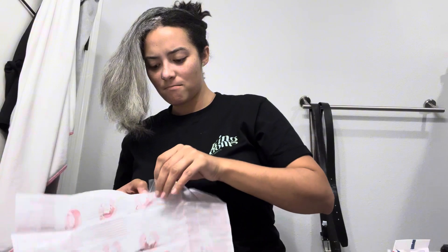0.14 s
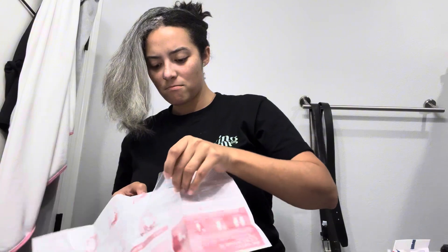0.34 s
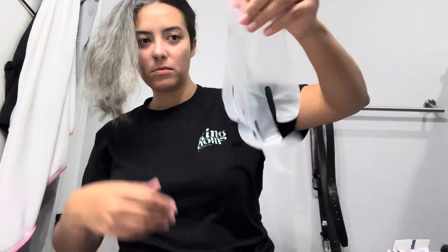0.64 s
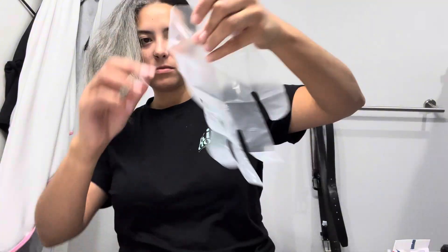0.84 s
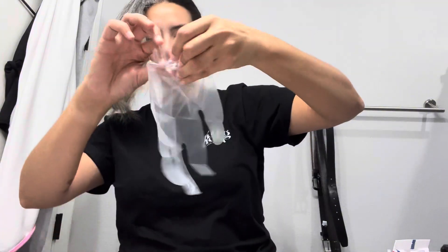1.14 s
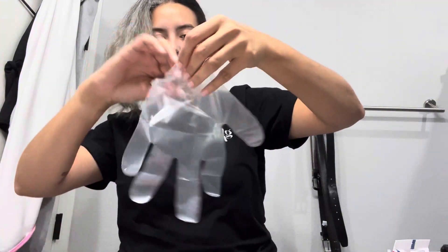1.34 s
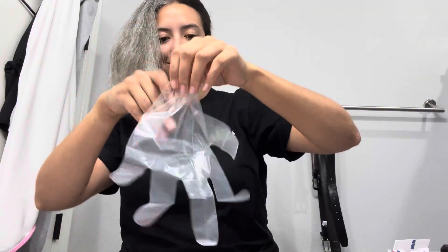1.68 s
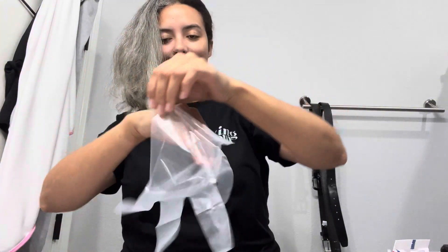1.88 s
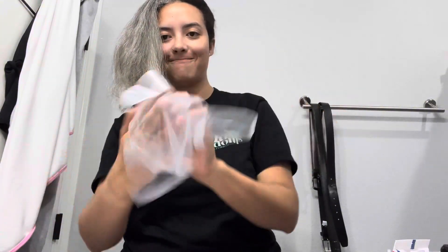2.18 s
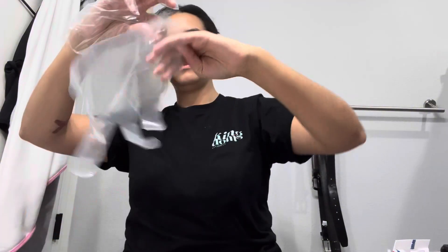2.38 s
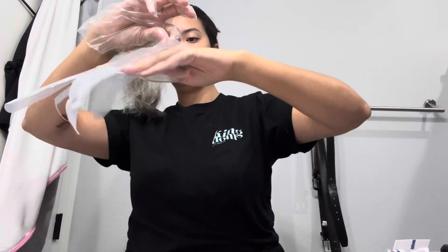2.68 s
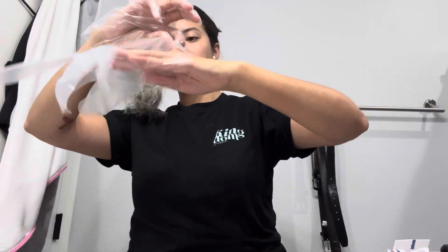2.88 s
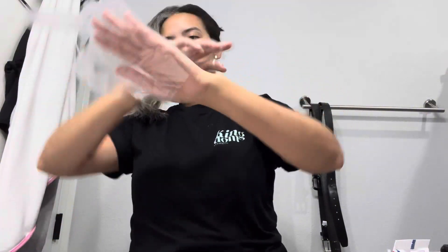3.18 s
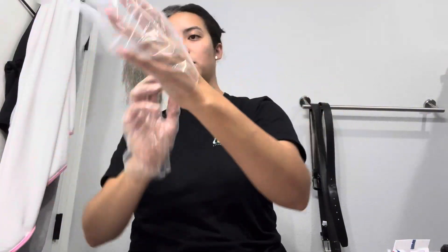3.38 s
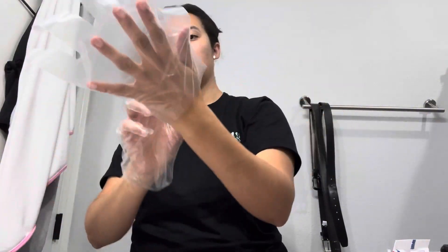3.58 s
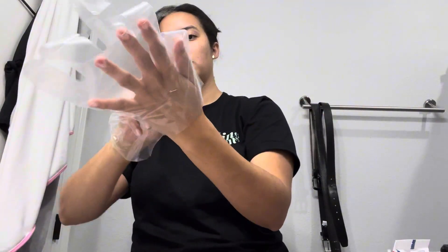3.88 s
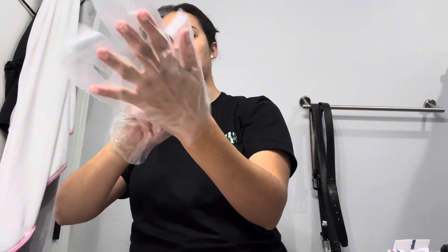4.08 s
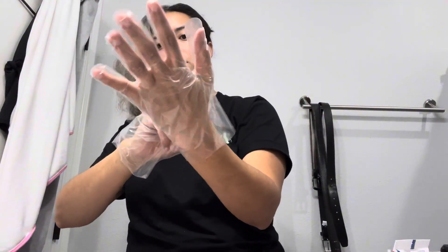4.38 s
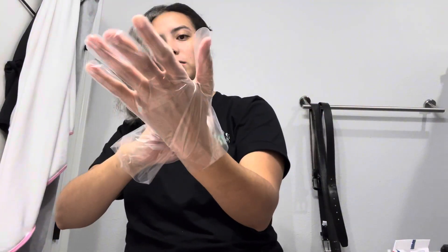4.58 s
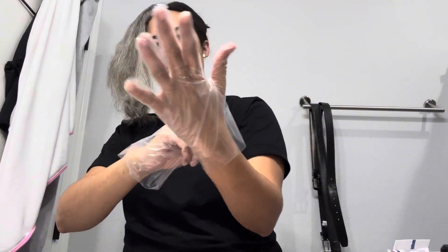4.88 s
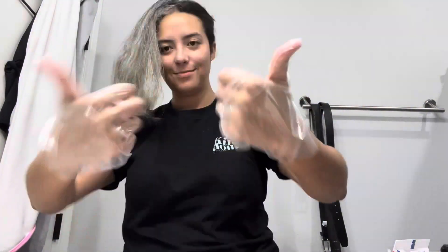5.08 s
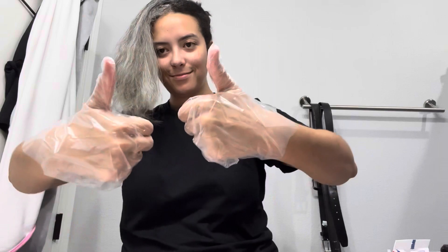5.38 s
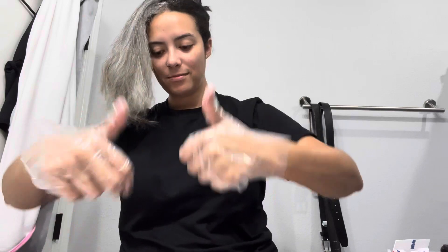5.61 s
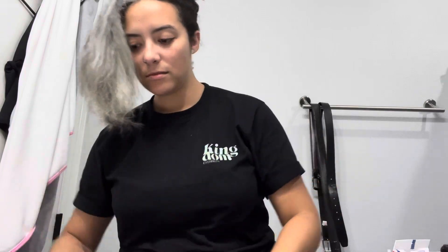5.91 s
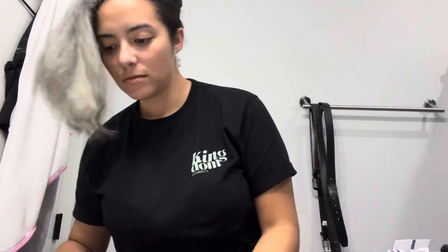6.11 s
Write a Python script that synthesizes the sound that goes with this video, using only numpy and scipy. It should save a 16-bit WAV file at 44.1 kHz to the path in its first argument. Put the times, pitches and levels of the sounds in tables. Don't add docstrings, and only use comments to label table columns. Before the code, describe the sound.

In a small, hard bathroom, close to a stereo microphone, a low fan hum near 59 Hz and soft air rumble run throughout. From 0 to 0.69 s a stiff folded leaflet is pulled open: dense crackle, low sheet flexing and hard snaps, loudest around 0.28 to 0.57 s. A tiny gap cuts to thin plastic gloves, much quieter and brighter. Sparse rustle grows from 1.0 s into uneven crackling bursts, stronger around 1.7 to 2.2 s. Another gap at 2.28 s, then the second glove: light rustles, firmer at 2.9 s and strongest near 4.0 to 4.1 s, followed by dense fine ticks until 5.12 s. After a third short gap, the crackle fades almost to nothing around 5.3 to 5.5 s, returns softly to 6.1 s, then paper crackles and bumps the counter with small thuds near 6.22 s.

```python
import sys
import numpy as np
from scipy import signal
from scipy.fft import rfft, irfft, next_fast_len
from scipy.io import wavfile
from scipy.ndimage import uniform_filter1d, minimum_filter1d

SR = 44100
rng = np.random.default_rng(int(sys.argv[2]) if len(sys.argv) > 2 else 0)


def transcribe(u):
    v = np.clip(np.atleast_2d(u).T, -1, 1)
    q = np.round(v * 32767).astype(np.int16)
    wavfile.write(sys.argv[1], SR, q)


N = 275625
TIME = np.arange(N) / SR
SIZE = next_fast_len(N + SR)
HZ = np.maximum(np.arange(SIZE // 2 + 1) * SR / SIZE, 1)
LEAFLET_DOWN_S, LEAFLET_BACK_S = .69, 6.15

# start t/s, length/s, crackle level/dB at first, at the end
PAPER_MOVES = [(0.0, 0.057, -53, -56), (.078, 0.014, -50, -38.5), (.11, 0.035, -54, -61),
               (.166, 0.028, -38, -48), (.215, 0.062, -54, -50), (.278, 0.018, -34.5, -42.5),
               (.31, .05, -43.5, -42), (.372, 0.034, -35.5, -40), (.42, 0.032, -33.5, -39),
               (.46, 0.038, -39, -46), (.574, 0.01, -33, -51), (6.17, .03, -52, -55),
               (6.213, 0.069, -37.5, -55)]
# start t/s, length/s, crackle level/dB at
GLOVE_MOVES = [(.70, 0.068, -59.5, -57.5), (.80, 0.064, -53, -57), (.90, 0.04, -63, -60.5),
               (.95, 0.052, -64, -53), (1.0, 0.065, -50.5, -47.5), (1.10, 0.16, -48.5, -56.5),
               (1.30, 0.1, -49.5, -47), (1.45, 0.13, -47.5, -48), (1.64, 0.13, -47.5, -46),
               (1.74, 0.15, -43.5, -53), (1.92, 0.2, -43, -53.5), (2.04, 0.12, -45.5, -52.5),
               (2.165, 0.041, -37.5, -50.5), (2.30, .04, -45.5, -57.5), (2.356, 0.023, -44.5, -58.5),
               (2.41, 0.048, -58, -59),
               (2.49, 0.21, -61, -54), (2.657, 0.22, -59.5, -53), (2.898, 0.13, -46, -43),
                 (3.085, 0.10, -64, -54.5), (3.199, 0.033, -49, -52), (3.24, 0.17, -51.5, -57.5),
                 (3.41, 0.034, -57, -63), (3.475, 0.073, -49.5, -49.5), (3.59, 0.17, -54, -54.5),
                 (3.786, 0.11, -54, -47), (3.957, 0.15, -48.5, -39), (4.197, 0.051, -51, -44.5),
                 (4.304, 0.15, -54, -53.5), (4.485, 0.048, -54, -54.5), (4.569, .04, -49.5, -64),
                 (4.66, 0.048, -52, -61), (4.73, 0.085, -54, -57.5), (4.856, 0.034, -58, -50.5),
                 (4.9, 0.2, -62.5, -54), (5.024, 0.08, -49, -49.5), (5.134, 0.07, -67, -60.5),
                 (5.237, 0.058, -55, -67.5), (5.283, 0.032, -64.5, -79), (5.334, 0.014, -71, -86),
                 (5.387, 0.026, -69, -76), (5.46, 0.023, -75, -66), (5.544, 0.15, -59.5, -53),
                 (5.694, 0.18, -56.5, -49.5), (5.924, 0.27, -61.5, -57)]
# t/s, level/dB
TAUTNESS = [(.7, 0), (1.7, -3), (2.5, -1.5), (3.5, -1.5), (4.1, 4), (5.0, 0), (6.2, 0.5)]
# f/Hz, level/dB per Hz
CRACKLE_COLOUR = [(120, 10.5), (250, 0.5), (500, -1.5), (750, -14.5), (1400, -7), (2100, -6.5), (3200, -8),
                  (4500, -6), (7000, 0), (9000, 2.5), (11000, 0), (13000, 4), (15300, 4)]
# t/s, peak level/dB, centre f/Hz
PAPER_SNAPS = [(0.0217, -32.5, 4420), (0.0462, -31.5, 1580), (0.0867, -41, 3170), (0.0975, -24.5, 2250),
               (0.1030, -26, 2300), (0.1561, -38, 4800), (0.1640, -29, 3400), (0.1761, -35, 3100),
               (0.1928, -22, 2550), (0.2365, -23, 2280), (0.2505, -25, 2300), (0.2774, -22, 2600),
               (0.2855, -10, 3070), (0.3247, -19.5, 3360), (0.3685, -11, 3060), (0.3712, -10.5, 4600),
               (0.4098, -32, 5200), (0.4385, -17, 3360), (0.4788, -16, 3300), (0.4820, -21, 3270),
               (0.5054, -35, 2270), (0.5716, -13.5, 6500), (6.1914, -31, 6500), (6.2127, -26, 6100),
               (6.2173, -38, 10000)]
GLOVE_SNAPS = [(0.7212, -41, 8700), (0.799, -39, 6800), (0.8671, -31, 5900), (0.9128, -33, 2500),
               (0.9165, -44, 5800), (0.9991, -52, 8600), (1.005, -47, 7400), (1.017, -35, 7260),
               (1.043, -44, 6200), (1.058, -44, 6750), (1.082, -26, 9500), (1.141, -32, 11100),
               (1.1724, -38, 9100), (1.2002, -31.5, 8300), (1.2676, -31.5, 8600), (1.3, -27, 7060),
               (1.326, -40, 7600), (1.3613, -31.5, 9700), (1.378, -36.0, 8900), (1.4011, -47, 7500),
               (1.4648, -30, 7040), (1.5104, -32, 8100), (1.5341, -35, 8800), (1.6203, -28.5, 8050),
               (1.6286, -34.0, 6500), (1.6484, -27, 11000), (1.6541, -37, 9700), (1.6606, -41, 7800),
               (1.6837, -43, 8900), (1.7545, -29, 5800), (1.7712, -27.0, 10000), (1.831, -32, 10200),
               (2.0517, -30, 7900), (2.1027, -32.5, 7400), (2.138, -30, 7500), (2.2418, -33, 9200),
               (2.2805, -31, 5300),
               (2.3555, -34, 7600), (2.3733, -30.5, 5600), (2.4308, -44.5, 5600), (2.4449, -42.5, 7900),
                 (2.4615, -38, 5040), (2.472, -52, 7600), (2.5169, -45, 11900), (2.5408, -37.0, 7700),
                 (2.6463, -33, 5000), (2.7683, -37, 8600), (2.8125, -36.5, 7700), (2.8993, -31, 7300),
                 (2.9377, -27, 7300), (3.02, -27.0, 7500), (3.0355, -31, 9600), (3.0936, -40.5, 4900),
                 (3.3247, -37, 5600), (3.332, -48, 7200), (3.374, -43, 7900), (3.3893, -42, 11100),
                 (3.406, -37, 8160), (3.4377, -60, 4700), (3.4716, -37.5, 5200), (3.493, -39, 7300),
                 (3.5184, -48, 7900), (3.5957, -46, 5900), (3.6005, -58, 9100), (3.606, -36, 9600),
                 (3.624, -50, 6200), (3.6634, -49, 9300), (3.6876, -45, 10700), (3.6956, -31, 10000),
                 (3.7065, -34.5, 10100), (3.7166, -43, 9500), (3.737, -31.5, 4200), (3.7899, -31.5, 8650),
                 (3.812, -30.5, 7400), (3.8636, -31, 4800), (3.8923, -35, 5900), (3.932, -32.5, 3400),
                 (3.9427, -29, 6300), (3.98, -28, 7600), (3.9996, -25, 8400), (4.1614, -29.5, 4800),
               (4.2163, -29, 10300), (4.2502, -27.5, 9800), (4.3006, -38, 7300), (4.3241, -33, 11300),
                   (4.337, -27, 7300), (4.3493, -32, 7360), (4.3584, -42, 11400), (4.3744, -31.5, 7700),
                   (4.3974, -36, 11500), (4.4064, -35.5, 11600), (4.427, -38, 10300), (4.4411, -33.5, 3380),
                   (4.466, -45, 11000), (4.493, -39.5, 10100), (4.5005, -32.5, 5170), (4.5152, -29, 10000),
                   (4.5218, -28.5, 11600), (4.5376, -29.5, 10400), (4.59, -39, 8000), (4.599, -47, 7200),
                   (4.6078, -50, 10000), (4.6236, -30.5, 7500), (4.6394, -44, 6960), (4.6474, -49, 8200),
                   (4.6618, -42.5, 8000), (4.6717, -51.5, 10200), (4.694, -42.5, 6400), (4.713, -46, 8300),
                   (4.7234, -39, 8300), (4.728, -35, 11200), (4.733, -31.5, 7400), (4.7364, -45, 10400),
                   (4.7535, -39.5, 10000), (4.7642, -40.5, 6300), (4.7706, -42, 6300), (4.7942, -39, 10000),
                   (4.7986, -29, 7900), (4.8055, -33, 9400), (4.8568, -41, 10800), (4.87, -37, 12100),
                   (4.8733, -46, 12400), (4.8904, -37, 10700), (4.9165, -43, 7840), (4.9266, -30.5, 7570),
                   (4.9361, -37.5, 5200), (4.9508, -30.5, 10500), (4.9746, -39.0, 9700),
                   (4.9839, -32.5, 7900), (5.0043, -34.5, 7250), (5.0397, -30, 8800),
                   (5.0525, -28.5, 11100), (5.0647, -26.5, 9970), (5.0915, -30, 7500), (5.124, -31, 7200),
               (5.145, -40, 10000), (5.1588, -42, 7400), (5.1699, -35, 8200), (5.1896, -41.0, 7400),
                  (5.2905, -42, 9300), (5.2995, -49.0, 7400), (5.309, -52, 9900), (5.3369, -40.5, 8900),
                  (5.3731, -67, 9900), (5.388, -48, 5000), (5.4426, -49, 5900), (5.4517, -50, 9600),
                  (5.4699, -49.5, 9600), (5.481, -52, 5600), (5.5399, -56, 9600), (5.5462, -41.5, 9800),
                  (5.5557, -37.5, 10800), (5.5734, -37, 7600), (5.6432, -38.5, 7800), (5.6808, -37, 9400),
                  (5.709, -39, 8300), (5.719, -37.0, 7800), (5.7723, -38, 8400), (5.811, -34.0, 6600),
                  (5.8372, -34, 5800), (5.8704, -46, 9100), (5.88, -27.5, 10300), (5.8924, -41, 8300),
                  (5.9193, -37, 7200), (5.963, -42, 11300), (5.976, -43, 10600), (5.9825, -36.5, 11600),
                  (6.0374, -40, 10500), (6.08, -41, 12100), (6.1043, -48, 6900), (6.118, -42.5, 7100),
                  (6.134, -48, 7200)]
# t/s, bending level/dB, low modes over upper modes/dB
FLEX = [
    [(0.0, -44.5, 10), (0.022, -48, -3), (0.116, -52, 8), (0.146, -51, 4), (0.204, -37, -2), (0.27, -41, 3),
     (0.30, -37.5, 5), (0.356, -41, 2), (0.382, -33.5, -9), (0.45, -38.5, -4), (0.52, -45, 11.5),
     (0.57, -50, 3), (0.68, -64, -9)],
    [(6.12, -72, 5), (6.2, -54.5, 17), (6.226, -49, 6), (6.25, -45, 6)],
]
# f/Hz, width/Hz, level/dB
SHEET_LOW = [(100, 28, -5.5), (150, 27, -27), (228, 8.7, -5.5)]
SHEET_UPPER = [(322, 150, -11), (385, 31, 7), (473, 56, 7), (589, 43, 6), (684, 150, -2.5)]
# t/s, peak level/dB, length/ms, push 1 or pull -1
BUMPS = [
    (6.185, -42, 4.9, -0.81),
    (6.2161, -27, 2.5, -1),
    (6.2223, -33, 2.1, 0.91),
    (6.2249, -40, 2.5, -0.85),
    (6.226, -32, 3, 1),
    (6.231, -33, 1.9, 1),
    (6.2326, -32, 2.3, -1.1),
    (6.237, -37, 4.6, -1),
    (6.2465, -34, 4, 1),
]
# f/Hz, level/dB per Hz
FAN_AIR = [(15, -23), (25, 11), (48, -3), (70, -2), (86, -12.5), (104, -6), (139, -9.5), (186, -19),
           (290, -20.5), (528, -27.5), (659, -40), (1500, -59), (1950, -37), (3300, -120)]
# f/Hz, left-right likeness
AIR_LIKENESS = [(60, 1.0), (240, 0.6), (950, -0.62), (3770, -1.2), (15000, 0.08)]
# f/Hz, lead/rad
PORT_LEAD = [(300, 0), (1400, -.2), (2100, -.5), (4800, 0), (7300, 3.2), (8300, 3.4), (9650, 4.6),
             (11000, 6.28), (12400, 6.4), (13800, 8.2), (14800, 9.42)]
# f/Hz, lead/rad
LEAD_SPREAD = [(150, 0), (400, 1.2), (700, 2.0), (1400, .8), (3000, .9), (4200, 2.6), (6200, 2.4),
               (7600, .4), (10000, .8), (11500, .3), (13500, 1.0), (15000, .4)]
# f/Hz, left over right/dB
LEFT_OVER_RIGHT = [(60, 4), (150, 5), (380, -2), (950, 0), (2380, -0.5), (5980, -2.5), (15000, -0.5)]
# f/Hz, echo over direct/dB
BATHROOM = [(100, -3), (300, 2), (700, 7.5), (1500, 4), (3000, 1), (5000, -2.5), (8000, -1), (11500, 0.5),
            (15000, -4)]
# cut t/s, sound returns t/s, fade/s, fan turn after it/cycles
SPLICES = [
    (.6878, .696, .014, -.31),
    (2.281, 2.292, .010, .41),
    (5.1255, 5.134, .005, -.27),
]
# from f/Hz, to f/Hz, dropped at this level/dB against the side
MID_DIPS = [(7000, 7600, -9), (7600, 8300, -7), (8300, 8900, -7), (13800, 14900, -8), (14250, 14900, -5)]


def from_db(db):
    return 10 ** (np.asarray(db) / 20)


def rms_one(x):
    return x / np.sqrt(np.mean(np.atleast_2d(x).mean(axis=0) ** 2) + 1e-20)


def at_hz(points):
    hz, value = np.transpose(points)
    return np.interp(np.log(HZ), np.log(np.maximum(hz, 1)), value)


def shaped(x, response):
    return irfft(rfft(x, SIZE) * response, SIZE)[..., :N]


def drift(rate_hz):
    r = np.exp(-2 * np.pi * rate_hz / SR)
    slow = signal.lfilter([1], [1, -2 * r, r * r], rng.standard_normal(N + SR))[SR:]
    return rms_one(slow - slow.mean())


def resonate(x, hz, width_hz):
    r = np.exp(-np.pi * width_hz / SR)
    poles = [1, -2 * r * np.cos(2 * np.pi * hz / SR), r * r]
    return signal.lfilter([(1 - r * r) / 2, 0, (r * r - 1) / 2], poles, x + 1e-18)


def cracks(per_s, spread_db, clump_db, clump_rate):
    sizes = from_db(spread_db * np.minimum(rng.exponential(1, N), 4)) * rng.choice([-1, 1], N)
    return sizes * (rng.random(N) < per_s / SR) * from_db(clump_db * drift(clump_rate))


def effort(moves):
    grip_s, let_go_db_per_s, rest_db = 0.0054, 195, -76
    power = from_db(2 * rest_db)
    for start, length, first_db, last_db in moves:
        held_db = np.interp(TIME, [start, start + max(length, .001)], [first_db, last_db])
        held_db = held_db - let_go_db_per_s * np.maximum(TIME - start - length, 0)
        grip = np.clip((TIME - start) / grip_s + 1, 0, 1)
        power = power + grip ** 2 * from_db(2 * held_db)
    return 10 * np.log10(power)


def facet_levels():
    paper_db, film_db = effort(PAPER_MOVES), effort(GLOVE_MOVES)
    taut_db = np.interp(TIME, *np.transpose(TAUTNESS))
    over_middle_db = ((-2.5, -6.5), (0, 0), (-4.5, taut_db))
    return [10 * np.log10(from_db(2 * (paper_db + paper)) + from_db(2 * (film_db + film)))
            for paper, film in over_middle_db]


def facet_crackle():
    panel_hz, panel_width_hz, panel_db = 3150, 180, 8
    clicks = cracks(per_s=4000, spread_db=2.5, clump_db=1.0, clump_rate=410)
    dealt = rng.integers(0, 14, N)
    rings = 1.29 * clicks
    for k, hz in enumerate(np.geomspace(700, 14000, 14)):
        ring = resonate(clicks * (dealt == k), hz, 0.28 * hz)
        rings = rings + ring * np.sqrt(9000 / hz) * from_db(4.26 * drift(2.8))
    edges = [1 / (1 + (HZ / hz) ** 8) for hz in (100, 2500, 7500, 20000)]
    crackle = 0
    for low, high, level_db, trim_db in zip(edges, edges[1:], facet_levels(), (-3.5, -3.0, -1.5)):
        band = shaped(rings, (high - low) * from_db(at_hz(CRACKLE_COLOUR)))
        crackle = crackle + rms_one(band) * from_db(level_db + trim_db)
    paper = crackle * (TIME < LEAFLET_DOWN_S)
    return crackle + from_db(panel_db) * resonate(paper, panel_hz, panel_width_hz)


def crease_snaps():
    length = 900
    echo_ms, echo_db = 2.4, -13
    broad_share = 0.3
    out, ms = np.zeros(N + length), 1000 * np.arange(length) / SR
    creases = PAPER_SNAPS + GLOVE_SNAPS
    for s, peak_db, hz in creases:
        if LEAFLET_DOWN_S < s < LEAFLET_BACK_S:
            rise_ms, tear_ms, reach, width, trim_db = 0.35, 1.05, 1.8, 0.65, -3.5
        else:
            rise_ms, tear_ms, reach, width, trim_db = 0.9, 2.2, 1.7, 0.7, -8
        tear_ms = tear_ms * from_db(0.1 * (peak_db + 23.5))
        tear = rng.standard_normal(length) * np.minimum(ms / rise_ms, 1) * np.exp(-ms / max(tear_ms, .2))
        band = signal.butter(1, [hz / reach ** 2, min(reach * hz, 20000)], "band", fs=SR)
        burst = broad_share * signal.lfilter(*band, tear) + resonate(tear, min(hz, 15000), width * hz)
        peak = np.sqrt(uniform_filter1d(burst ** 2, size=24).max())
        i = round(s * SR)
        out[i:i + length] += from_db(peak_db + trim_db) * burst / peak
    echo = np.roll(out, round(echo_ms * SR / 1000))
    return out[:N] + from_db(echo_db) * echo[:N]


def sheet_flex():
    knocks = cracks(per_s=700, spread_db=0.0, clump_db=3.5, clump_rate=43)
    out = 0
    for low, modes in ((True, SHEET_LOW), (False, SHEET_UPPER)):
        body = 0
        for k, (hz, width_hz, db) in enumerate(modes):
            body = body + (-1) ** k * from_db(db) * resonate(knocks, hz, width_hz)
        level = 0
        for bend in FLEX:
            s, bend_db, low_db = np.transpose(bend)
            level = level + from_db(np.interp(TIME, s, bend_db + low * low_db, -120, -120))
        out = out + rms_one(body) * level
    return out * from_db(-5.5)


def counter_bumps():
    out = 0
    for s, db, ms, way in BUMPS:
        phase = np.clip((TIME - s) * 1000 / ms, 0, 1)
        out = out + way * from_db(db) * np.sin(np.pi * phase) ** 2
    return out


def in_bathroom(x):
    t60_s, first_echo_s = 0.24, .0015
    t = np.arange(SR // 2) / SR
    half = np.array([[.5], [-.5]])
    lead = np.interp(HZ, *np.transpose(PORT_LEAD))
    nearness = from_db([22 * drift(9) for spot in range(8)])
    shares = nearness / np.sqrt(np.sum(nearness ** 2, axis=0))
    out = 0
    for share, place in zip(shares, np.linspace(-1, 1, 8)):
        wash = rng.standard_normal((2, len(t))) * from_db(-60 * t / t60_s) * (t > first_echo_s)
        wash = rfft(wash / np.sqrt(np.sum(wash ** 2) / 2), SIZE) * from_db(at_hz(BATHROOM))
        direct = np.exp(1j * half * (lead + place * at_hz(LEAD_SPREAD)))
        out = out + rfft(x * share, SIZE) * (direct + wash)
    return irfft(out * from_db(half * at_hz(LEFT_OVER_RIGHT)), SIZE)[:, :N]


def ceiling_fan():
    motor_hz, motor_db, air_db = 58.945, -36, -48
    turn = np.full(N, -.445)
    for cut, back, fade, cycles in SPLICES:
        turn[TIME > cut] = cycles
    balance_db = np.array([[.9], [-.9]])
    tone = np.cos(2 * np.pi * (motor_hz * TIME + turn))
    tone = tone * from_db(motor_db + 0.05 * drift(8.0) + balance_db)
    alike = np.clip(at_hz(AIR_LIKENESS), -1, 1)
    spread = np.sqrt([1 + alike, 1 - alike])
    rumble_tilt = 0.043 + 1 / (1 + (72 / HZ) ** 6)
    mid, side = shaped(rng.standard_normal((2, N)), from_db(at_hz(FAN_AIR)) * spread * rumble_tilt)
    air = rms_one(np.array([0.94 * (mid + side), 1.05 * (mid - side)]))
    return tone + from_db(air_db + .6 * drift(1)) * air


def below(hz):
    return 1 / (1 + (HZ / hz) ** 240)


def thin_treble(sound):
    attack_db, attack_hold_s = 9.0, .012
    mid_top_hz, side_gap_hz = 14650, (10400, 12900)
    frame, too_faint_db = 1024, -77
    mid, side = (sound[0] + sound[1]) / 2, (sound[0] - sound[1]) / 2
    power = uniform_filter1d(shaped(sound[0], 1 - below(8000)) ** 2, 128) + 1e-14
    before = np.roll(uniform_filter1d(power, 900), 600)
    calm = 1. * (power < before * from_db(2 * attack_db))
    calm = minimum_filter1d(calm, round(attack_hold_s * SR))
    calm = uniform_filter1d(calm, 128)
    mid = mid - calm * shaped(mid, 1 - below(mid_top_hz))
    for low_hz, high_hz, under_db in MID_DIPS:
        bands = shaped(np.array([mid, side]), below(high_hz) - below(low_hz))
        energy = np.add.reduceat(bands ** 2, np.arange(0, N, frame), axis=1)
        energy = np.repeat(energy, frame, axis=1)[:, :N]
        limit = energy[1] * from_db(2 * under_db) + frame * from_db(2 * too_faint_db)
        mid = mid - calm * uniform_filter1d(1. * (energy[0] < limit), 256) * bands[0]
    side = side - calm * shaped(side, below(side_gap_hz[1]) - below(side_gap_hz[0]))
    return np.array([mid + side, mid - side])


def splice_gain():
    gain = np.ones(N)
    for cut, back, fade, cycles in SPLICES:
        gain = np.where(TIME > cut, np.clip((TIME - back) / fade, .05, 1), gain)
    return uniform_filter1d(gain, 16)


def scene():
    handled = facet_crackle() + crease_snaps() + sheet_flex() + counter_bumps()
    return in_bathroom(handled) + ceiling_fan()


def low_pass(x):
    return signal.sosfilt(signal.butter(12, 16500, fs=SR, output="sos"), x)


def record(dry):
    edge_hz, above_edge_db = 15900, -40
    rounded = .55 * np.tanh(dry / .55)
    sound = shaped(rounded, np.where(HZ < edge_hz, 1, from_db(above_edge_db)))
    return low_pass(thin_treble(sound) * splice_gain())


dry = scene()
out = record(dry)
transcribe(out)
```